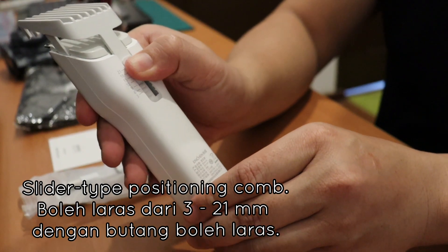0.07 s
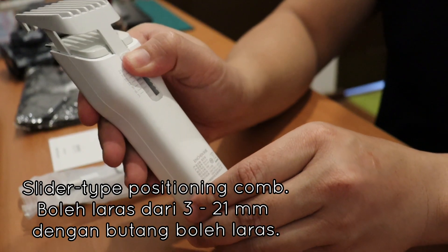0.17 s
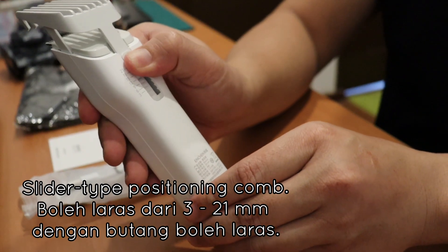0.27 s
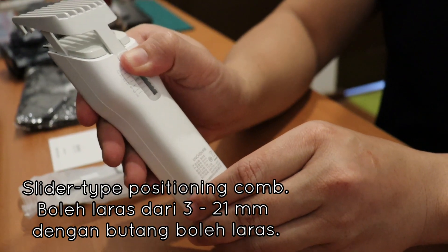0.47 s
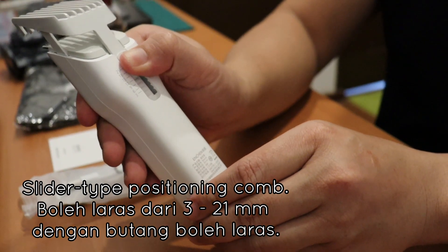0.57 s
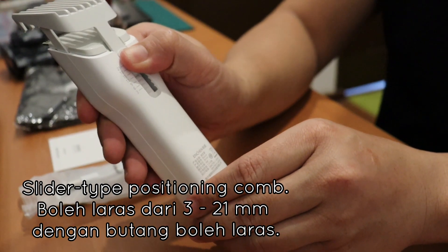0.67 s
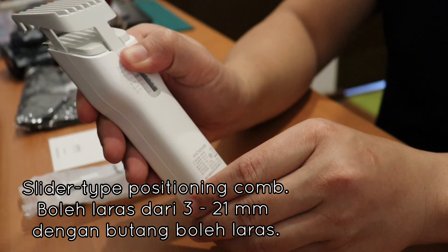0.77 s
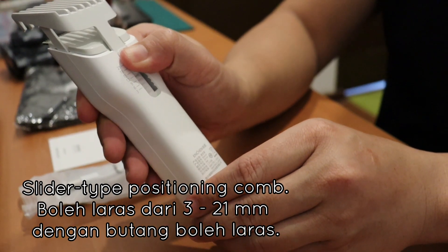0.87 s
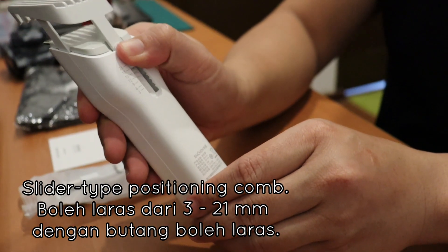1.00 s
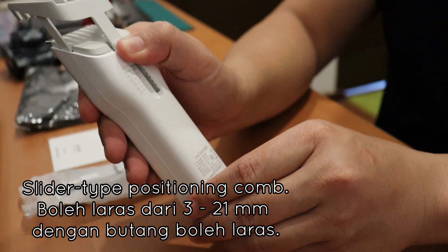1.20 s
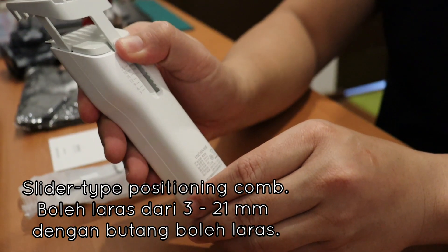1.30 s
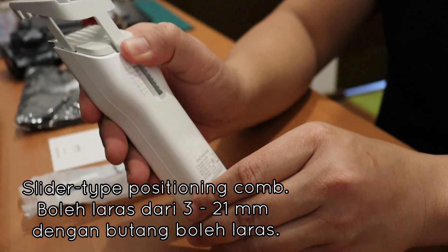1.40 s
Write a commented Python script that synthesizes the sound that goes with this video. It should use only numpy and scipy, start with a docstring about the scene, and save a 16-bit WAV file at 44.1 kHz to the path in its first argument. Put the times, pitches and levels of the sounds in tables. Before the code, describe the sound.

A hair clipper's plastic slider snaps once and ticks softly over a low room rush.

```python
"""A small room, at a table. A thumb pushes the comb slider of a plastic hair clipper over a detent:
the catch scuffs, snaps home and rings the shell. Later the slider shifts with a soft double tick.
The table and the room answer; a steady low rush, like a fan's, fills the room."""
import sys
import numpy as np
from scipy import signal
from scipy.fft import rfft, irfft, next_fast_len
from scipy.io import wavfile
from scipy.ndimage import map_coordinates

SR = 44100
rng = np.random.default_rng(int(sys.argv[2]) if len(sys.argv) > 2 else 0)


def log_audio(samples):
    """Write samples as a 16-bit WAV file to the path given in sys.argv[1]."""
    # one column per channel
    frames = np.atleast_2d(samples).T
    # limit to full scale, then quantise
    limited = np.clip(frames, -1, 1)
    pcm = np.round(limited * 32767).astype(np.int16)
    wavfile.write(sys.argv[1], SR, pcm)


N = 63945

# catch contacts: t/s, level/dB, left-right/dB, crack t60/s
CATCH_CONTACTS = [(0.2119, -24, 8.5, 0.015), (0.2141, -17.5, 10, .012), (0.2146, -12, -4, 0.0068),
                  (0.216, -3, 10, 0.0045), (.2168, -5.5, -3, 0.0019), (0.2179, -10.5, 3.5, 0.0088),
                  (0.2192, -18.5, 1.5, .006), (0.2208, -13.5, 1.5, 0.0091), (0.2309, -30, 5, 0.00795)]
# crack spectrum: f/Hz, level/dB
CRACK_SPECTRUM = [(150, -8), (600, -13.5), (1050, -6.5), (1280, -6.5), (1600, -6), (2100, -14.5),
                  (2500, -12), (3100, -5), (3800, -9), (4800, 5.5), (6300, -1), (7400, -15.5), (8300, 1),
                  (10700, 2), (13000, 5.5), (14400, -3.5), (15400, 0.5)]
# crack stereo image: f/Hz, left-right likeness/0-1
CRACK_LIKENESS = [(300, 0.73), (1800, 0.81), (3200, .6), (5500, .2), (12000, 0.2)]
# weak, crowded shell modes: f/Hz, level/dB
CROWD_SPECTRUM = [(300, -29.5), (1000, -11), (1300, -6), (1700, 1), (2200, 6.5), (2500, -6), (3100, 1),
                  (3750, -1), (4500, 8.5), (6000, 3), (7400, -3), (9500, 0), (12500, -8), (15500, -3.5)]
CROWD_DB, CROWD_T60_S = -18, 0.061


def snap():
    """Each contact of the catch gives a crack and a short wash of crowded shell modes."""
    out = np.zeros((2, N))
    for start_s, db, side_db, t60_s in CATCH_CONTACTS:
        t = since(start_s)
        crack = pan(side_db) * noise(CRACK_SPECTRUM, CRACK_LIKENESS) * fade(t, t60_s)
        crowd = amp(CROWD_DB) * noise(CROWD_SPECTRUM) * fade(t, CROWD_T60_S)
        out += amp(db) * (crack + crowd)
    return out


# strong shell modes: f/Hz, level/dB, t60/s, left-right/dB
SHELL_MODES = [(1050, -10, .03, 0), (1630, -8, .04, 0), (1980, -4, .04, 1), (2210, -9, .04, -8),
               (2900, -9, .02, 0), (3170, -10, .018, 0), (4090, -9, .035, 0), (4565, -2, .05, -1),
               (5110, -4, .035, -3), (5545, -5, .035, 1), (10140, -1, .016, 7), (10760, 4, .014, 12),
               (12610, 0, .014, 9), (15250, 0, .016, 4)]
SEAT_S, SHELL_DB = 0.2161, -19.5
SCATTER_HZ = 5070  # higher modes reach the two sides out of step


def shell():
    """The catch seats and rings the quickly damped modes of the plastic shell."""
    t = since(SEAT_S)
    out = np.zeros((2, N))
    for hz, db, t60_s, side_db in SHELL_MODES:
        phase_rad = hz / SCATTER_HZ * rng.standard_normal((2, 1))
        out += pan(side_db) * amp(db) * fade(t, t60_s) * np.sin(2 * np.pi * hz * t + phase_rad)
    return amp(SHELL_DB) * out


# slider contacts: t/s, level/dB, t60/s, ring re tick/dB, ping offset/dB
SLIDER_TICKS = [(1.0178, -42, 0.026, -14, -2), (1.0222, -34.5, 0.052, -5, 5), (1.026, -36, 0.034, -4, 0),
                (1.0320, -40, 0.047, 8, -17), (1.207, -53, .04, -1, -2)]
# tick spectrum: f/Hz, level/dB
TICK_SPECTRUM = [(300, -22), (1500, -6), (2100, 0), (2450, -6), (2800, 8), (3300, 2.5), (3850, -4.5),
                 (4200, 0.5), (5100, 2.5), (5800, -2.5), (6800, -5), (7500, -20), (8800, -9.5),
                 (10500, -12), (13000, -13), (15500, -7.5)]
# hollow slider ring: f/Hz, level/dB, t60/s
SLIDER_MODES = [(2760, -6, .015), (3115, 0, .015)]
PING_HZ, PING_DB, PING_T60_S = 5080, -8, 0.038


def slider():
    """The slider shifts in its track: duller, weaker contacts with a brief hollow ring."""
    out = np.zeros((2, N))
    for start_s, db, t60_s, ring_db, ping_offset_db in SLIDER_TICKS:
        t = since(start_s)
        modes = [*SLIDER_MODES, (PING_HZ, PING_DB + ping_offset_db, PING_T60_S)]
        ring = sum(amp(mode_db) * fade(t, mode_t60_s) * np.sin(2 * np.pi * hz * t)
                   for hz, mode_db, mode_t60_s in modes)
        tick = noise(TICK_SPECTRUM) * fade(t, t60_s)
        out += amp(db) * (tick + amp(ring_db) * ring)
    return out


# room tail decay: f/Hz, t60/s
TAIL_DECAY = [(300, 0.3), (2000, 0.76), (5000, 0.75), (10000, 0.56), (15000, 0.43)]
# room tail spectrum: f/Hz, level/dB
TAIL_SPECTRUM = [(300, 4.5), (2000, 1.5), (5000, 0), (10000, 0), (15000, -4.5)]
ROOM_DELAY_S, TAIL_DB = 0.008, -10.5
EARLY_DB, EARLY_T60_S = -8, 0.084


def room(x):
    """Quick echoes from the table and near walls, then a diffuse tail."""
    hz, t, bands = signal.stft(rng.standard_normal((2, SR)), SR, nperseg=256)
    bands *= fade(t, along(TAIL_DECAY, hz)[:, None])
    bands *= amp(along(TAIL_SPECTRUM, hz))[:, None]
    tail = signal.istft(bands, SR, nperseg=256)[1][:, :SR]
    early = rng.standard_normal((2, SR)) * fade(np.arange(SR) / SR, EARLY_T60_S)
    response = (amp(TAIL_DB) * unit(tail) + amp(EARLY_DB) * unit(early)) / np.sqrt(SR)
    response = np.pad(response, ((0, 0), (int(ROOM_DELAY_S * SR), 0)))
    return signal.fftconvolve(x[None], response, axes=1)[:, :N]


# rush spectrum: f/Hz, relative density/dB
RUSH_SPECTRUM = [(15, -58), (25, -31), (43, -34), (82, -12), (119, -5.5), (144, -3), (169, -8.5), (183, -9),
                 (204, -2), (253, -7), (289, -9), (359, -19), (445, -13.5), (582, -15.5), (684, -15),
                 (804, -13), (1080, -19), (1240, -16.5), (1660, -21.5), (1850, -22.5), (3260, -36),
                 (9300, -49), (15500, -49)]
# rush stereo image: f/Hz, left-right likeness/0-1
RUSH_LIKENESS = [(60, .99), (110, 0.99), (200, 0.97), (380, .56), (700, 0.64), (1300, .37), (2400, 0.031),
                 (10000, 0.0201)]
# hum tones: f/Hz, level/dB
HUM_TONES = [(55, -62), (119, -54), (200, -51), (453, -60), (797, -64.5)]
# swell of rush and hum: t/s, gain/dB
SWELL = [(0, 0.5), (.65, 0.03), (.82, 1), (1.0, 1.63), (1.45, 0.5)]
RUSH_DB, HUM_WAVER_DB = -38.5, 2.5


def background():
    """A low fan-like rush, nearly mono in the bass, with a wavering hum."""
    t = since(0)
    hum = np.zeros(N)
    for hz, db in HUM_TONES:
        rms = amp(db + HUM_WAVER_DB * wobble(knots_per_s=8.05))
        phase_rad = 0.9 * wobble(knots_per_s=7.35)
        hum += rms * np.sqrt(2) * np.sin(2 * np.pi * hz * t + phase_rad)
    rush = amp(RUSH_DB) * noise(RUSH_SPECTRUM, RUSH_LIKENESS)
    swell_db = np.interp(t, *np.transpose(SWELL))
    return amp(swell_db) * (rush + hum)


def amp(db):
    """Decibels to gain."""
    return 10 ** (np.asarray(db) / 20)


def unit(x):
    """Scale to rms 1."""
    return x / np.sqrt(np.mean(x ** 2) + 1e-20)


def along(points, hz):
    """Interpolate (f/Hz, value) points on a log axis."""
    f, v = np.transpose(points)
    return np.interp(np.log(hz + 1), np.log(f + 1), v)


def filtered(x, response):
    """Apply a frequency response."""
    m = next_fast_len(N + SR // 2)
    return irfft(rfft(x, m) * response(np.fft.rfftfreq(m, 1 / SR)), m)[..., :N]


def noise(spectrum, likeness=None):
    """Coloured stereo noise, rms 1, with optional left-right likeness by frequency."""
    pair = filtered(rng.standard_normal((2, N)), lambda hz: amp(along(spectrum, hz)))
    if likeness is None:
        return unit(pair)
    angle = lambda hz: np.arccos(np.clip(along(likeness, hz), -1, 1)) / 2
    mid, side = filtered(pair, lambda hz: np.array([np.cos(angle(hz)), np.sin(angle(hz))]))
    return unit(np.array([mid + side, mid - side]))


def wobble(knots_per_s):
    """Smooth random curve."""
    return map_coordinates(rng.standard_normal(N // 100), [np.arange(N) * knots_per_s / SR])


def since(start_s):
    """Seconds since start_s, zero before it."""
    return np.maximum(np.arange(N) / SR - start_s, 0)


def fade(t, t60_s):
    """Instant rise, exponential decay."""
    return (t > 0) * np.exp(-np.log(1000) * t / t60_s)


def pan(db):
    """Left and right gains for a level difference."""
    return amp(np.array([[db], [-db]]) / 2)


def scene():
    """The clipper close up, over the background; each side wakes its own echoes."""
    contacts = snap() + slider()
    ring = shell()
    room_send = contacts + amp(db=-11) * ring
    echoes = sum(room(side) for side in room_send) / np.sqrt(2)
    return contacts + ring + echoes + background()


TOP_HZ = 15750


def record(dry):
    """Peak clipping between two steep low-passes."""
    band = lambda hz: 1 / (1 + (hz / TOP_HZ) ** 200)
    clipped = np.clip(filtered(dry, band), -0.88, 0.88)
    return filtered(clipped, band)


dry = scene()
out = record(dry)
log_audio(out)
```